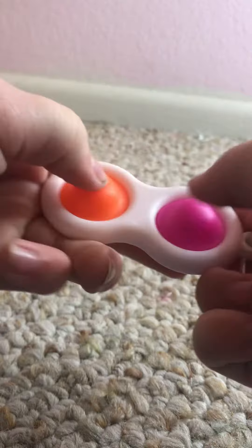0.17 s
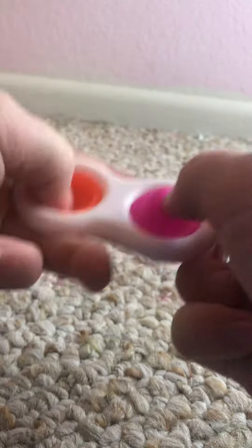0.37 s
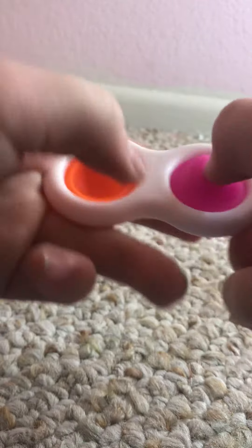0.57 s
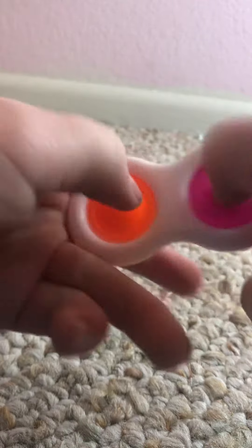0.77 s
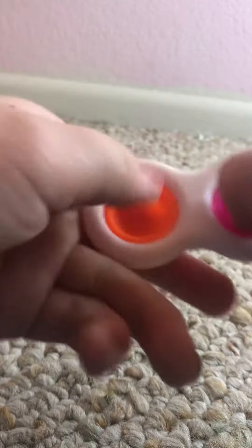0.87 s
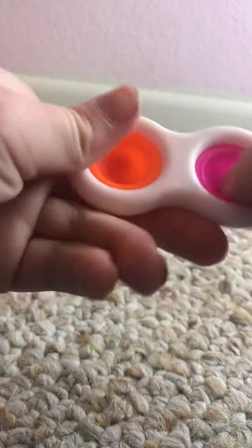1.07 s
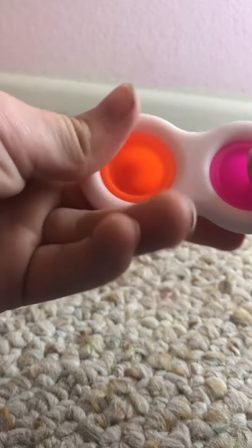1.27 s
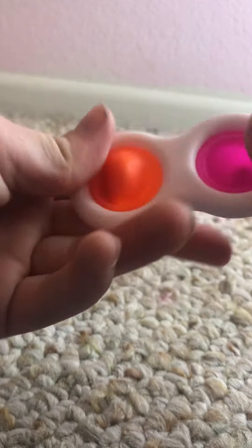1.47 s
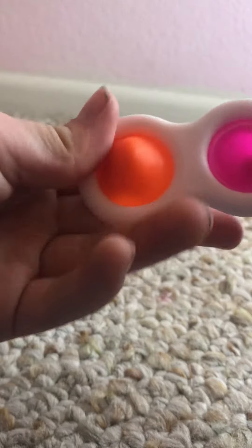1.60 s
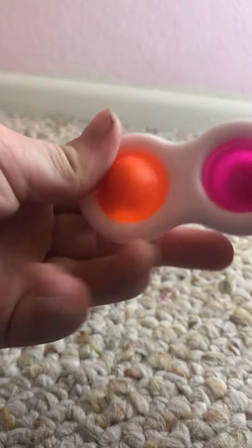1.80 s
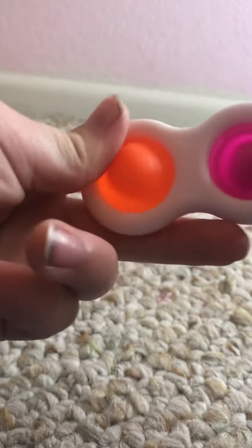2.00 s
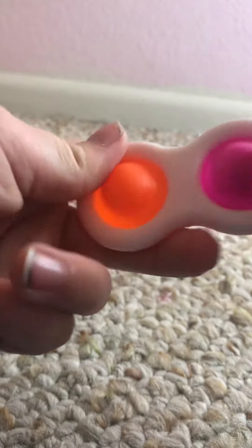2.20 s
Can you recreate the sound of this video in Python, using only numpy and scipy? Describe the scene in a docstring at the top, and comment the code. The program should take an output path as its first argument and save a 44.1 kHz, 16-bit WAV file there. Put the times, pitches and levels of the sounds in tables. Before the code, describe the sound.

Two sharp pops, then two duller ones, from a silicone fidget toy pressed up close.

```python
"""A small carpeted room, the microphone close to a plastic fidget toy with two silicone domes.
Thumbs press each dome through: it buckles and its skin snaps taut with a sharp slap.
Then each is pushed back from behind with a duller, hollow pop. In between, fingers tick and slide
on the frame. The floor, a wall and a short room tail answer, over quiet room tone."""
import sys
import numpy as np
from scipy import signal
from scipy.fft import rfft, irfft, next_fast_len
from scipy.io import wavfile
from scipy.ndimage import map_coordinates

SR = 44100
rng = np.random.default_rng(int(sys.argv[2]) if len(sys.argv) > 2 else 0)


def inscribe(sig):
    """Save sig as 16-bit PCM at rate SR to the path in sys.argv[1].

    A 1-D sig is mono; a 2-D sig holds one channel per row.
    Samples are clipped to [-1, 1] before scaling.
    """
    pcm = np.round(np.clip(np.atleast_2d(sig).T, -1, 1) * 32767)
    wavfile.write(sys.argv[1], SR, pcm.astype(np.int16))


N = 99225
T = np.arange(N) / SR

# room tone and hiss: frequency_hz, level_db
AIR_SPECTRUM = [(20, -18), (40, -7), (68, 1), (120, -6.5), (200, -13), (350, -15.5), (600, -20),
                (1500, -25), (3000, -28.5), (6500, -30), (10500, -32), (12300, -28), (12900, -18),
                (13500, -27.5), (15700, -30.5), (16200, -54.5)]
# decay of the room's tail: frequency_hz, t60_s
TAIL_DECAY = [(100, 0.25), (900, 0.14), (4000, 0.17), (12000, 0.16)]
# colour of the room's tail: frequency_hz, level_db
TAIL_SPECTRUM = [(80, -8.5), (250, -11.5), (500, -4.5), (850, 0), (1250, -1), (1700, -8), (2400, -5.5),
                 (3300, 1.5), (4200, -5.5), (5500, -0.5), (8000, -6), (14000, -4)]
# fingers sliding on the toy: peak_s, rise_s, fall_s, rasp_db, hiss_db, rumble_db
FINGER_RUBS = [(0.192, .008, .012, -57, -61, -44), (.438, .017, .004, -49, -66, -89),
               (0.49, 0.005, .025, -60, -68.5, -76), (.684, .008, 0.023, -64, -57.5, -55),
               (.96, 0.14, 0.1, -75.5, -69, -80), (1.301, 0.033, 0.033, -71.5, -70.5, -78),
               (1.377, 0.011, 0.01, -73, -65.5, -53), (1.806, .025, 0.028, -70.5, -89.5, -76),
               (2.21, 0.073, 0.062, -71.5, -61, -90)]
# the three noises of a slide: frequency_hz, level_db
RASP_SPECTRUM = [(200, -13), (1000, 2), (2300, -5), (4000, 5), (6500, -4), (9000, -21.5), (16000, -25)]
HISS_SPECTRUM = [(500, -18), (3000, -27), (7000, -6.5), (10000, -4.5), (13500, -2.5), (16000, -8.5)]
RUMBLE_SPECTRUM = [(25, -21), (70, 12), (200, 6), (500, -17), (1500, -33.5), (8000, -66)]
# fingers and nails on the frame: start_s, knock_db, pitch_ratio, click_db, click_t60_s
FINGER_TICKS = [(.183, -43, .6, -42, 0.017), (0.3158, -50, 0.96, -57.5, 0.017),
                (0.408, -55.5, 0.86, -49, 0.0071), (0.441, -62, 1.2, -44.5, 0.0044),
                (.487, -52, 0.81, -54, 0.0088), (0.5662, -51.5, 2.2, -56, .012), (.568, -55, .8, -56, .012),
                (.6095, -52, 0.56, -47, .012), (0.611, -45, .65, -44.5, .014),
                (0.6374, -53.5, 0.92, -61.5, .012), (0.683, -59, 1, -46.5, 0.0049),
                (.711, -57, 0.43, -51, .005), (0.9276, -41.5, 1.11, -44.5, 0.00786),
                (0.933, -50, 0.89, -55, 0.015), (.980, -57.5, 1.18, -52, 0.015),
                (1.1064, -36, 1.31, -34, 0.013), (1.1432, -46.5, 1.15, -42, 0.0079),
                (2.1869, -44, 0.735, -33.5, 0.0096), (2.1917, -44, 0.76, -42, 0.014)]
# modes of the frame, before a tick's pitch ratio: pitch_hz, level_db, t60_s
FRAME_MODES = [(950, -9, 0.0077), (1250, 4.5, 0.0096), (1830, -3, .005)]
# colour of a tick's click: frequency_hz, level_db
CLICK_SPECTRUM = [(300, -24), (700, -16), (1200, -3), (2600, -2), (4000, 2), (6000, -0.5), (9500, -7.5),
                  (12800, -2), (16000, -18.5)]
# each dome's taut skin slapping the rim: pitch_hz, level_db, t60_s
PINK_SKIN_MODES = [(1644, -6, 0.0052), (3339, -19.5, 0.022), (4010, -1, 0.0068), (4340, -1.5, .0062),
                   (6200, -13, 0.0062), (7280, -5, 0.0043), (8687, -11, .0057)]
ORANGE_SKIN_MODES = [(1390, -13, .004), (2120, -4, .0052), (3790, -5, 0.0072), (5370, -13, 0.0071),
                     (6430, -8, .0068), (7140, -11, 0.0075), (8840, -23, 0.0038)]
# domes flipping; the send is what escapes the hand into the room:
# start_s, swing_db, pitch_hz, swell_s, cavity_db, crack_db, thump_db, send_db
DOME_FLIPS = [(.2040, -13.5, 1100, 0.00077, -15, -8, -40, 3), (.7329, -8, 916, .00063, -10.5, -6, -37, -2),
              (1.4228, -16, 1058, 0.00069, -23, -33.5, -76, -4.5),
              (1.9748, -25.5, 987, 0.00064, -40.5, -39.5, -74, -3),
              (1.9787, -6.5, 1272, 0.00045, -26, -21.5, -36, -3)]
# the hollow under a dome, cupped by the hand: pitch_hz, level_db, t60_s
CAVITY_MODES = [(275, 1.5, .0085), (665, 8.5, 0.0065), (1154, -2, .0105)]
# colour of a dome's crack: frequency_hz, level_db
CRACK_SPECTRUM = [(300, -19), (1500, -9.5), (2200, 1), (3000, -1), (5000, -1), (7200, 1.5), (9800, -6),
                  (12000, 0), (15000, -2), (17000, -16)]


def amp(db):
    """Decibels to gain."""
    return 10 ** (np.asarray(db) / 20)


def unit(x):
    """Scale to rms 1."""
    return x / np.sqrt(np.mean(x ** 2) + 1e-20)


def along(points, hz):
    """Interpolate (frequency_hz, value) points on a log frequency axis."""
    freqs, values = np.transpose(points)
    return np.interp(np.log(hz + 1), np.log(freqs + 1), values)


def filtered(x, response):
    """Filter x by a response given as a function of frequency."""
    size = next_fast_len(len(x) + 8192)
    return irfft(rfft(x, size) * response(np.fft.rfftfreq(size, 1 / SR)), size)[:len(x)]


def noise(spectrum):
    """Coloured noise of rms 1."""
    return unit(filtered(rng.standard_normal(N), lambda hz: amp(along(spectrum, hz))))


def since(start_s):
    """Seconds since the start, zero before it."""
    return np.maximum(T - start_s, 0)


def burst(start_s, attack_s, t60_s):
    """A quick rise, then an exponential decay."""
    t = since(start_s)
    return (1 - np.exp(-(t / attack_s) ** 2)) * np.exp(-np.log(1000) * t / t60_s)


def ring(start_s, modes, attack_s):
    """Damped modes set off together."""
    return sum(amp(db) * burst(start_s, attack_s, t60_s) * np.sin(2 * np.pi * hz * since(start_s))
               for hz, db, t60_s in modes)


def room_tone():
    """The quiet air behind everything: low rumble and faint hiss."""
    return amp(-64.5) * noise(AIR_SPECTRUM)


def room(x, wall_s=.0142, wall_db=-27.5, tail_db=-16.5, attack_s=.0017):
    """Farther from the microphone: a faint echo off the wall and a short, coloured tail."""
    hz, t, bands = signal.stft(rng.standard_normal(SR // 2), SR, nperseg=256)
    decay = np.exp(-np.log(1000) * t / along(TAIL_DECAY, hz)[:, None])
    tail = signal.istft(bands * decay, SR)[1]
    tail = filtered(tail / np.linalg.norm(tail), lambda f: amp(along(TAIL_SPECTRUM, f)))
    tail *= 1 - np.exp(-(T[:len(tail)] / attack_s) ** 2)
    wall = filtered(x, lambda f: np.exp(-2j * np.pi * f * wall_s))
    return amp(wall_db) * wall + amp(tail_db) * signal.fftconvolve(x, tail)[:N]


def carpet(x, delay_s=.0032, pile_hz=950):
    """A bounce off the floor just below the toy; the pile absorbs the treble."""
    return amp(-13) * filtered(x, lambda f: np.exp(-2j * np.pi * f * delay_s) / np.hypot(1, f / pile_hz))


def rubs(grain_db=2.5, grains_per_s=260):
    """Fingers shift their grip near the microphone: grainy friction over a soft handling rumble."""
    roughness = map_coordinates(rng.standard_normal(N), [T * grains_per_s], order=1)
    grain = unit(amp(grain_db * roughness))
    rasp, hiss = grain * noise(RASP_SPECTRUM), grain * noise(HISS_SPECTRUM)
    rumble = noise(RUMBLE_SPECTRUM)
    close = np.zeros(N)
    for peak_s, rise_s, fall_s, rasp_db, hiss_db, rumble_db in FINGER_RUBS:
        swell = np.exp(-((T - peak_s) / np.where(T < peak_s, rise_s, fall_s)) ** 2)
        close += swell * (amp(rasp_db) * rasp + amp(hiss_db) * hiss + amp(rumble_db) * rumble)
    return close


def ticks(attack_s=.00023):
    """Light contacts: a knock of the frame, its pitch set by the grip, under a short scratchy click."""
    close, click = np.zeros(N), noise(CLICK_SPECTRUM)
    for start_s, knock_db, pitch_ratio, click_db, click_t60_s in FINGER_TICKS:
        gripped_modes = np.array(FRAME_MODES) * [pitch_ratio, 1, 1]
        close += amp(knock_db) * ring(start_s, gripped_modes, attack_s)
        close += amp(click_db) * burst(start_s, attack_s, click_t60_s) * click
    return close


def slaps():
    """Pressed from the front, each dome's skin snaps taut and rings. Returns close sound, room send."""
    pink = ring(start_s=.20468, modes=PINK_SKIN_MODES, attack_s=.0003)
    orange = ring(start_s=.73332, modes=ORANGE_SKIN_MODES, attack_s=.0003)
    return pink + orange, pink + amp(-2.5) * orange


def pops(thump_hz=68, thump_t60_s=.083):
    """A dome buckles, rings its hollow, cracks and jolts the hand. Returns close sound, room send."""
    close, send = np.zeros(N), np.zeros(N)
    crack_noise = noise(CRACK_SPECTRUM)
    for start_s, swing_db, pitch_hz, swell_s, cavity_db, crack_db, thump_db, send_db in DOME_FLIPS:
        t = since(start_s)
        swell = (t / swell_s * np.exp(1 - t / swell_s)) ** 3  # lasts two or three swings of the air
        swing = -amp(swing_db) * swell * np.cos(2 * np.pi * pitch_hz * (t - swell_s))
        cavity = amp(cavity_db) * ring(start_s + swell_s, CAVITY_MODES, attack_s=.00046)
        crack = amp(crack_db) * burst(start_s, attack_s=.00036, t60_s=.0065) * crack_noise
        thump = ring(start_s, [(thump_hz, thump_db, thump_t60_s)], attack_s=.004)
        pop = swing + cavity + crack + thump
        close += pop
        send += amp(send_db) * pop
    return close, send


def scene():
    """One microphone: the toy up close, the carpet below it, the room behind."""
    domes, dome_send = np.add(pops(), slaps())
    handling = ticks() + rubs()
    toy = domes + handling
    return (toy + carpet(toy) + room(dome_send + handling) + room_tone())[None]


def record(dry, low_cut_hz=46, top_hz=16000):
    """The recorder clips peaks at full scale, thins the deep bass and cuts the highest treble."""
    clipped = np.clip(dry[0], -1, 1)
    low_cut = signal.butter(3, low_cut_hz, "high", fs=SR, output="sos")
    band_limit = signal.butter(24, top_hz, fs=SR, output="sos")
    return signal.sosfilt(band_limit, signal.sosfilt(low_cut, clipped))[None]


dry = scene()
out = record(dry)
inscribe(out)
```